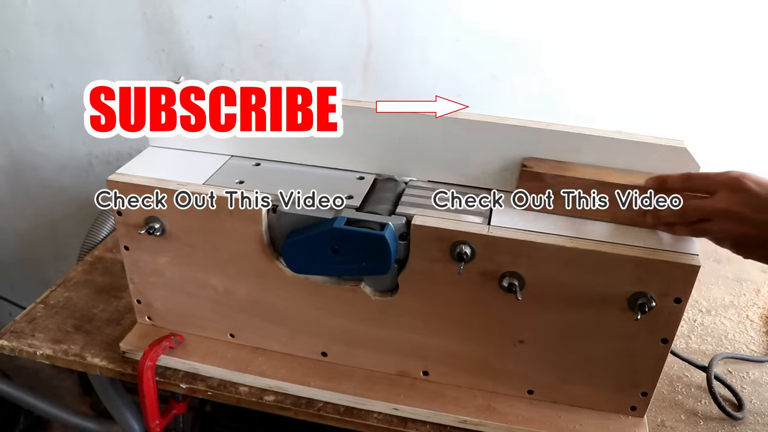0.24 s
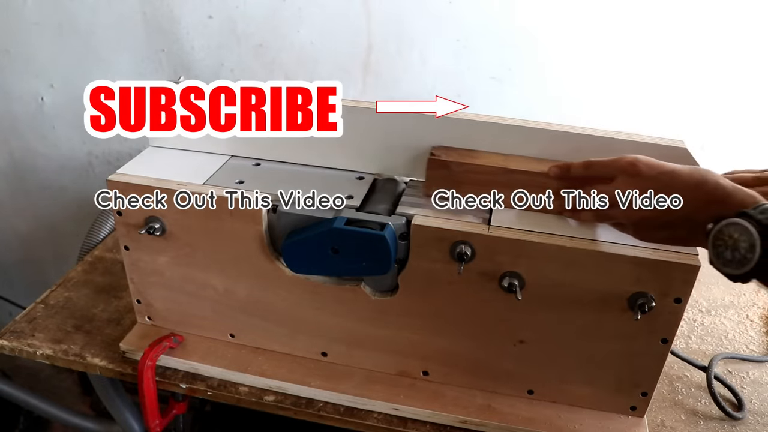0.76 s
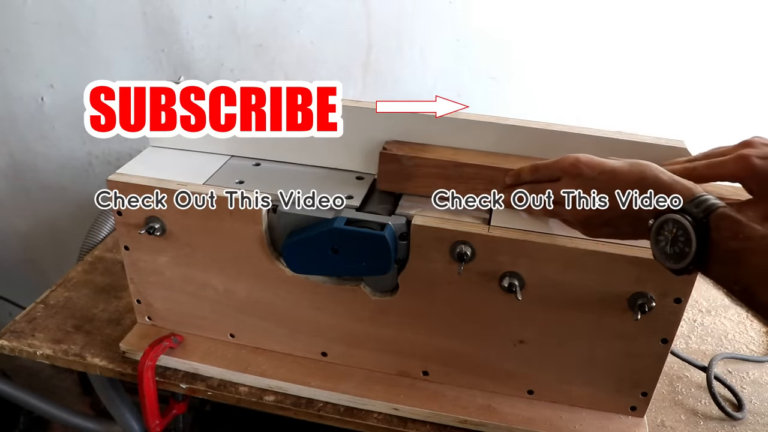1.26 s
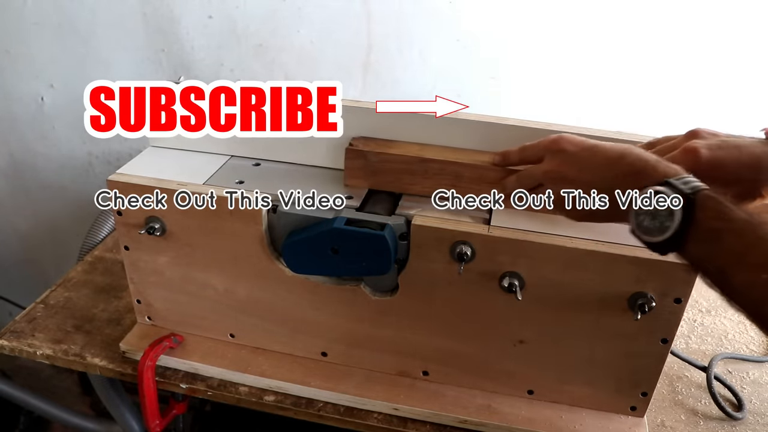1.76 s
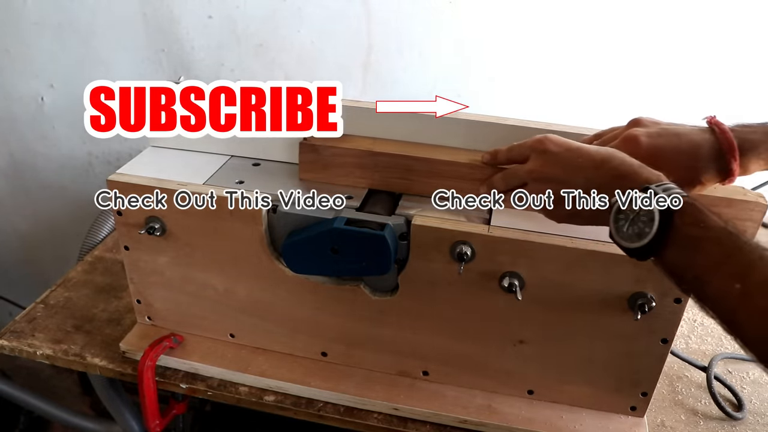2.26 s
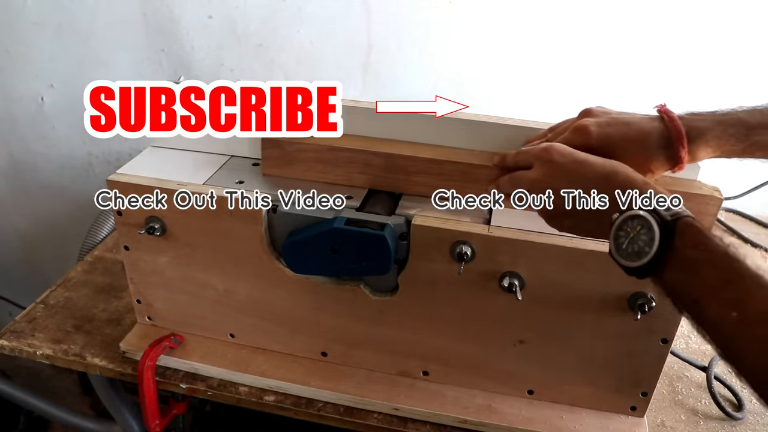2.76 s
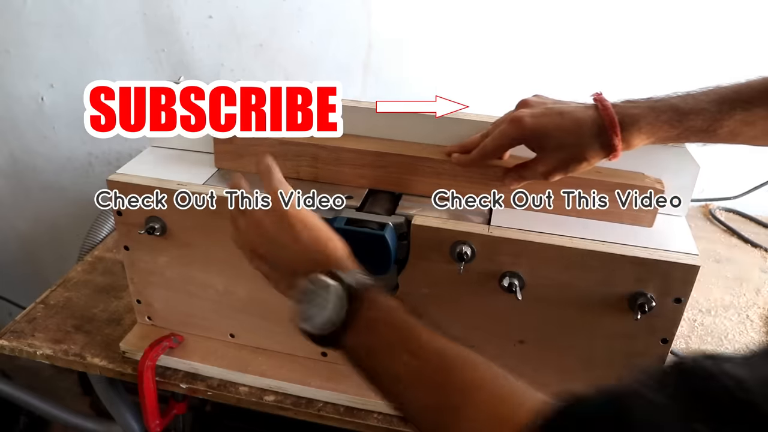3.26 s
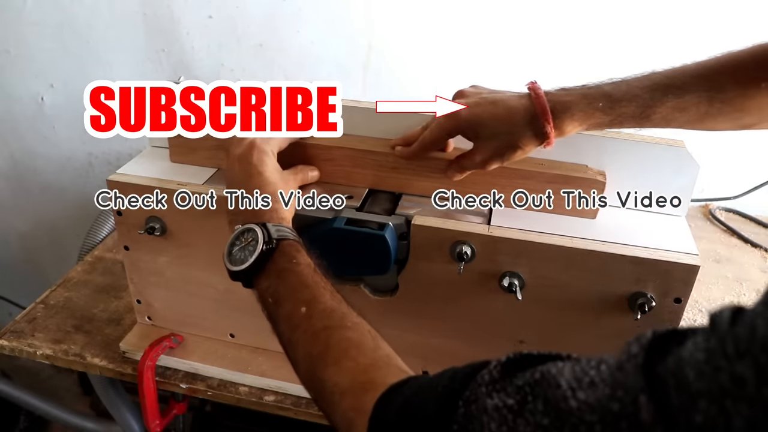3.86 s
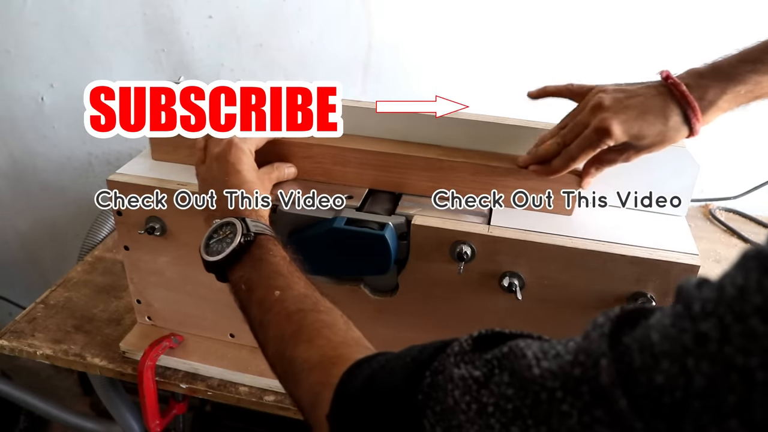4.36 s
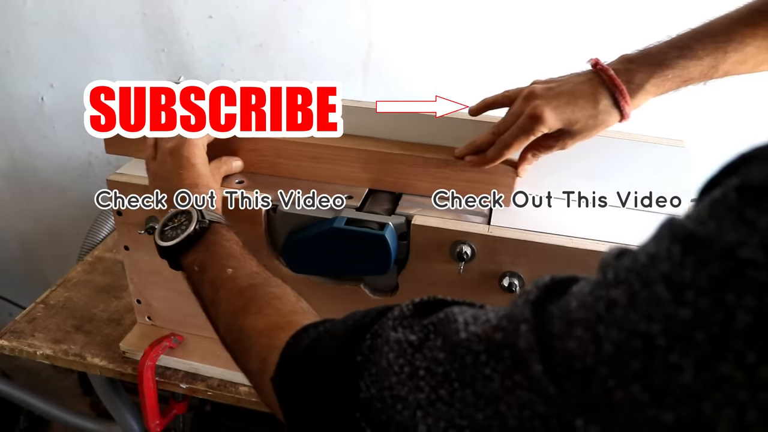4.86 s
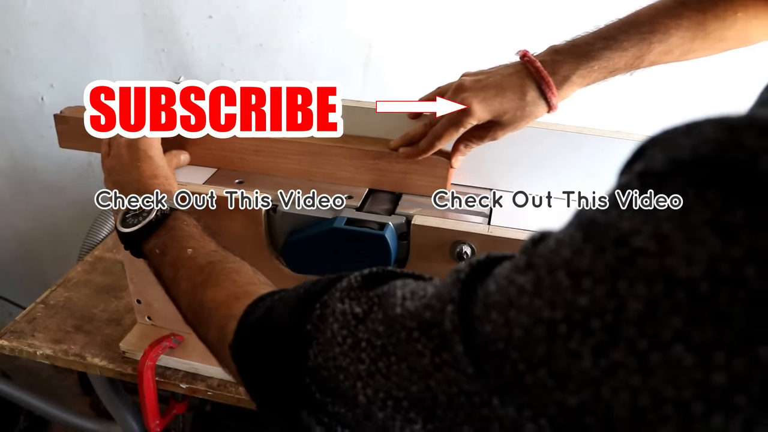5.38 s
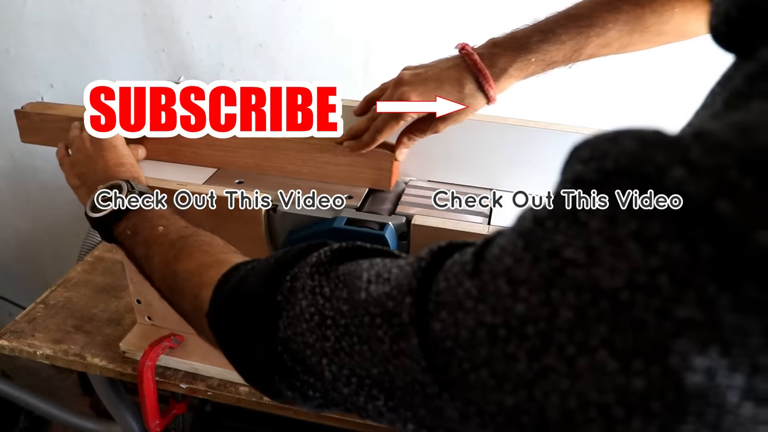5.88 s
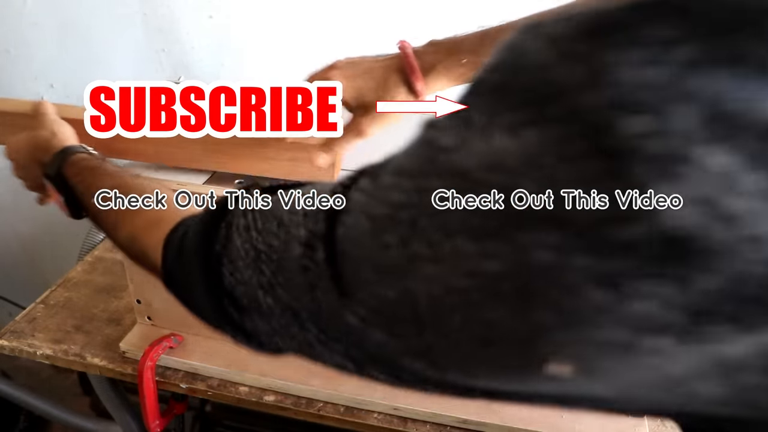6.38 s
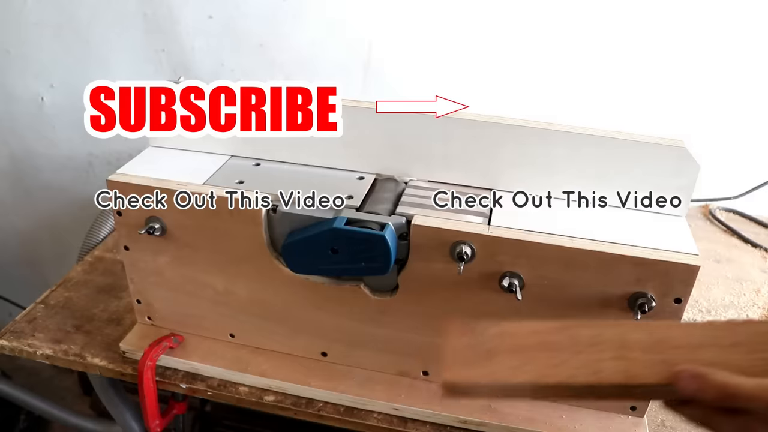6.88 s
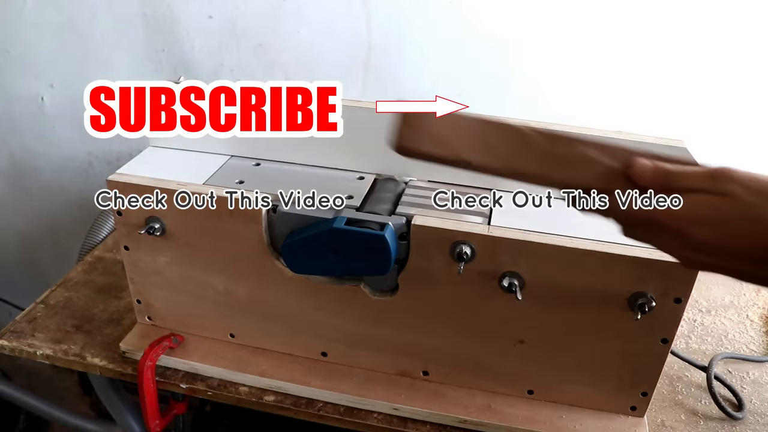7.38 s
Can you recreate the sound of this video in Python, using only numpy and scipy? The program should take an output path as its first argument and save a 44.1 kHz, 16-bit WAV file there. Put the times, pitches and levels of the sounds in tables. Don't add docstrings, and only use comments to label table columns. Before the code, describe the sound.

An electric planer whines shrilly at full speed with hissing air and chips as a board passes its cutter, then begins winding down.

```python
import sys
import numpy as np
from scipy import signal
from scipy.fft import rfft, irfft
from scipy.io import wavfile
from scipy.ndimage import uniform_filter1d

SR = 44100
rng = np.random.default_rng(int(sys.argv[2]) if len(sys.argv) > 2 else 0)


def store_wav(level_fs):
    pcm = np.round(np.clip(np.atleast_2d(level_fs), -1, 1) * 32767)
    wavfile.write(sys.argv[1], SR, pcm.T.astype(np.int16))


def rack_gain(trim_db):
    fader = np.asarray(trim_db, float)
    return 10 ** (fader / 20)


N = 336483
STEP = 40
GRID_S = np.arange(0, N + STEP, STEP) / SR
DRUM_RATIO = .8918


def rms_one(x):
    return x / np.sqrt(np.mean(x ** 2) + 1e-20)


def in_time(rows):
    s, *columns = np.transpose(rows)
    return [np.interp(GRID_S, s, c) for c in columns]


def at_hz(points, hz):
    points = np.array(points)
    return np.interp(np.log(hz), np.log(points[:, 0]), points[:, 1])


def smooth(control):
    between = np.arange(STEP) / STEP
    return (control[:-1, None] + np.diff(control)[:, None] * between).ravel()[:N]


def bump(x, centre, width):
    return np.exp(-4 * ((x - centre) / width) ** 2)


def drift(rate_hz):
    r = np.exp(-2 * np.pi * STEP * rate_hz / SR)
    noise = rng.standard_normal(len(GRID_S) + 2000)
    return rms_one(signal.lfilter([1], [1, -2 * r, r * r], noise)[2000:])


# t/s, fan blade rate f/Hz
SPEED = [(0.0, 1237.6), (0.77, 1240.5), (1.29, 1241.6), (1.74, 1235.6), (2.01, 1234.1), (2.37, 1239.7),
         (2.79, 1241.8), (3.18, 1239.4), (3.56, 1242.0), (4.11, 1245.2), (4.88, 1245.0), (5.23, 1234.6),
         (5.35, 1236.7), (5.78, 1216.1), (5.94, 1198.1), (6.18, 1220.8), (6.51, 1237.0), (7.01, 1245.1)]


def motor():
    power_off_s, inertia_s, coast_per_s = 7.01, .14, .63
    off = np.clip(GRID_S - power_off_s, 0, None)
    powered_hz = uniform_filter1d(in_time(SPEED)[0], size=int(inertia_s * SR / STEP), mode="nearest")
    blade_hz = powered_hz * np.exp(-coast_per_s * off)
    blades = np.cumsum(smooth(blade_hz + 0.443 * drift(16.8))) / SR
    coasting = np.interp(off, [0, .08], [0, 1])
    load = np.clip((1233 - blade_hz) / 12, 0, 1) * (1 - coasting)
    return blade_hz, blades, load, coasting, off


def line(turns, level_db, wobble_db, apart, lean=0.41):
    angle = 2 * np.pi * (turns + rng.random())
    shared = rack_gain(level_db + wobble_db * drift(6.2))
    usual = apart * rack_gain(0.58 * level_db + 0.39 * np.median(level_db))
    mid = smooth(shared) * np.sin(angle)
    in_phase = smooth(usual * drift(0.71) / shared - lean) * mid
    side = in_phase + smooth(usual * drift(0.61)) * np.cos(angle)
    return np.sqrt(2) * np.array([mid + side, mid - side])


# f/Hz, width/Hz, level/dB
STANDING = [(1100, 14, 10), (1235, 10, -13), (2191, 29, 6), (2441, 20, -14), (2491, 14, -8), (3322, 19, 9),
            (3729, 30, 11), (4962, 18, -11), (6205, 22, 10), (7437, 27, -12), (8670, 21, 8), (9896, 56, -5),
            (9968, 16, -22), (11169, 18, -13)]
# f/Hz, width/Hz, level/dB
CROSSED = [(813, 31, 8), (924, 33, 9), (996, 25, 6.5), (1787, 120, 6), (1995, 99, 5), (2680, 82, 10),
           (2846, 77, 10), (3186, 95, 8)]


def comb(rows, shifts, rate_hz, turns, coasting, wobble_db, apart):
    out = 0
    for k, db, coast_db in rows:
        k = int(k + .5)
        level_db = db + coast_db * coasting
        for hz, width, d in [*STANDING, *CROSSED]:
            level_db = level_db + d * bump(k * rate_hz, hz, width)
        for s, multiple, length, d in shifts:
            if abs(multiple - k) < .5:
                level_db = level_db + d * bump(GRID_S, s, length)
        out = out + line(k * turns, level_db, wobble_db, apart)
    return out


# multiple of blade rate, level/dB, gain while coasting/dB
FAN = [(1, -59.5, 1.5), (2, -44.5, -4.7), (3, -58.5, 2.5), (4, -54, -0.2), (5, -56, 0.2), (6, -44.5, -7),
       (7, -55, -0.2), (8, -60, 1), (9, -57, 3), (10, -62, 5)]
# multiple of blade rate, level/dB
FAN_TOP = [(11, -69), (12, -74), (13, -75), (14, -85)]
# t/s, multiple of blade rate, length/s, level/dB
FAN_SHIFTS = [(0.64, 6, 0.94, -13), (0.72, 10, 0.74, 9.5), (1.143, 5, 0.28, -10.5), (1.152, 8, 0.22, 11.5),
              (1.36, 3, 0.33, 6), (1.72, 7, 0.86, -19), (1.806, 4, 1.04, 9), (2.006, 3, 0.6, -8),
              (2.09, 2, 1.4, -7), (2.213, 5, 0.66, -18), (2.32, 1, 1.3, -10), (2.954, 7, 0.43, -11),
              (3.646, 7, 0.6, -16), (3.64, 10, 1.4, -17), (3.953, 6, 0.66, -7.5), (4.095, 9, 0.45, 7),
              (4.158, 4, 0.67, 8.5), (4.52, 1, 2.2, -6), (4.72, 5, 0.63, -13), (5.203, 3, 1.1, -4),
              (5.24, 10, 0.33, 8), (5.286, 6, 0.4, -12), (5.475, 5, 0.086, 13), (5.586, 7, 0.67, -7),
              (5.72, 4, 1.4, -0.5), (6.166, 2, 0.49, 6.5), (6.152, 6, 0.75, -13.5), (6.27, 7, 0.51, 7.5),
              (6.89, 6, 0.25, -9), (6.92, 8, 1.35, 11)]


def fan(blade_hz, blades, coasting):
    out = comb(FAN, FAN_SHIFTS, blade_hz, blades, coasting, wobble_db=1.23, apart=0.36)
    for k, db in FAN_TOP:
        out += line(int(k + .5) * blades, db + 5.5 * coasting, 4.9, 0.41)
    return out


# multiple of knife rate, level/dB, gain while coasting/dB
DRUM = [(1, -61.5, 1.5), (2, -76.5, 3.5), (3, -67.5, 0)]
# multiple of knife rate, level/dB
DRUM_TOP = [(4, -71.5), (5, -81), (9, -67)]
# t/s, multiple of knife rate, length/s, level/dB
DRUM_SHIFTS = [(0.4, 1, 0.21, 6.5), (0.68, 2, 0.21, 12.5), (0.72, 3, 0.31, 11.5), (1.36, 1, 0.16, -7),
               (1.84, 2, 0.38, 12), (2.32, 3, 1, -14), (3.72, 1, 0.34, -17), (3.8, 3, 0.74, -9),
               (5.0, 1, 0.28, -4), (5.399, 2, 1.4, 14.5), (7.4, 2, 0.47, 24), (7.44, 1, 1.76, 8)]


def drum(blade_hz, passes, coasting):
    out = comb(DRUM, DRUM_SHIFTS, DRUM_RATIO * blade_hz, passes, coasting, wobble_db=1.03, apart=0.32)
    for k, db in DRUM_TOP:
        out += line(int(k + .5) * passes, db + 3.0 * coasting, 4.9, 0.23)
    return out


# multiple of blade rate, level/dB, gain under load/dB, gain while coasting/dB
SHAFT = [(.5, -72.5, -21, 6), (3.5, -67, -13, -9), (4.5, -62.5, 2, 4.5), (8.5, -69, 2, -1)]
# t/s, length/s, level/dB
SHAFT_SHIFTS = [
    (.5, 1.5, -10),
    (3.3, 1.5, 5.5),
    (5.157, .7, 8),
    (6.6, 1.2, -20),
]
# multiple of blade rate, level/dB
FAINT = [(5.5, -72.5), (6.5, -72), (7.5, -69.5), (9.5, -71), (10.5, -77), (11.5, -80), (12.5, -78)]
# shaft turns, knife passes, level/dB
BEATS = [(1, 1, -65.5), (-0.58, 11, -87)]


def shaft(blades, passes, load, coasting):
    out = 0
    ninth_db = sum(d * bump(GRID_S, s, length) for s, length, d in SHAFT_SHIFTS)
    for k, db, load_db, coast_db in SHAFT:
        level_db = db + load_db * load + coast_db * coasting + ninth_db * (4 < k < 5)
        out = out + line(int(2 * k + .5) * blades / 2, level_db, 1.0, 0.1, lean=0.23)
    for m, k, db in BEATS:
        out += line(m * blades / 2 + k * passes, db - 9 * load - 9 * coasting, 3.4, 0.1)
    for k, db in FAINT:
        out += line(int(2 * k + .5) * blades / 2, db + 2.6 * coasting, 3.5, 0.45)
    return out


def light_rotor(blades, load, coasting, off):
    rotor_hz, drag_per_s, throb_hz, throb_db = 984.5, .65, 9.9, 4
    rotor = np.cumsum(smooth(rotor_hz / (1 + drag_per_s * off) ** 2)) / SR
    throb = throb_db * coasting * np.cos(2 * np.pi * throb_hz * (off - .1))
    out = line(rotor, -65 + 5 * np.tanh(off / .2) + throb, 0.59, 0.13, lean=.25)
    return out + line(rotor + blades / 2, -70 - 9 * load - 15 * coasting, 0.83, 0.22)


def whine():
    blade_hz, blades, load, coasting, off = motor()
    passes = DRUM_RATIO * blades
    out = fan(blade_hz, blades, coasting) + drum(blade_hz, passes, coasting)
    out += shaft(blades, passes, load, coasting) + light_rotor(blades, load, coasting, off)
    return out, load, coasting, off


# t/s, level/dB, brightness above the body/dB per octave
RUSH = [(0, -3, 0.9), (.5, 2, -0.9), (1, 0.5, 0.3), (2, -3.7, 1.1), (3, -1, 0), (3.55, 1, 0.6),
        (4, 3.2, 0.2), (4.5, -0.4, -0.3), (4.8, 2, 1), (5.39, 5.5, 0.2), (5.47, -2.8, 2.4), (5.65, -5.5, 0),
        (5.79, 3.8, 2), (5.95, -5.5, -1.5), (6.13, 2.8, 1.1), (6.24, -0.5, -3.3), (6.42, 3.5, 0.1),
        (6.96, 0.7, -0.4)]
# f/Hz, level/dB per Hz
AIR = [(71, -79), (120, -43.5), (615, -20.5), (906, -20.5), (1090, -13), (1360, -15), (2270, -8),
       (2420, -14), (2620, -5.5), (3640, -10), (5940, -7.5), (6310, -12), (6850, -8), (15800, -20.5)]
# f/Hz, width/Hz, level/dB
HOLLOWS = [(175, 5.6, 12), (238.8, 4.9, 17), (285.3, 3.4, 17), (348.3, 5.3, 14.5), (1775, 27, 7)]
# f/Hz, share alike
LIKENESS = [(60, 0.52), (240, 0.9), (950, 0.9), (3770, 0.41), (15000, 0.081)]
# f/Hz, level/dB
LEAN = [(60, -3), (240, -4), (950, 1), (3770, -5), (15000, 0.5)]
# f/Hz, share of swing, gain at power-off/dB, further change while coasting/dB per s
RUSH_COLOUR = [(1600, 0.75, 1.4, 8.5), (4600, 0.64, 0, 7), (10000, 0.95, 9, -8)]


def rush(coasting, off, patchy_db):
    swing_db, tilt_db = in_time(RUSH)
    white = rng.standard_normal((2, 2, N))
    together = drift(4.0)
    edges = 110 * 2 ** (np.arange(23) / 3)
    hz = np.fft.rfftfreq(N, 1 / SR)
    boost = 1 + sum((rack_gain(db) - 1) / (1 + (2 * (hz - top) / width) ** 2) for top, width, db in HOLLOWS)
    white = irfft(rfft(white) * boost, N)
    colour = np.array(RUSH_COLOUR)
    out = 0
    for k, (low, high) in enumerate(zip(edges, edges[1:])):
        band = signal.butter(2, [low, high], "band", fs=SR, output="sos")
        mid, side = signal.sosfilt(band, white[k % 2])
        centre = np.sqrt(low * high)
        share, off_db, slide_db = [at_hz(colour[:, [0, c]], centre) for c in (1, 2, 3)]
        level_db = share * swing_db + tilt_db * max(np.log2(centre / 1600), 0)
        level_db = level_db + off_db * coasting + slide_db * off - (1.5 + centre / 2500) * coasting
        patches_db = patchy_db * (.5 * together + drift(5.5))
        gain = smooth(rack_gain(at_hz(AIR, centre) + level_db + patches_db))
        alike = np.clip(at_hz(LIKENESS, centre), 0, .97)
        lean = rack_gain(at_hz(LEAN, centre) * np.array([[.5], [-.5]]))
        out = out + gain * lean * (np.sqrt(1 + alike) * mid + np.sqrt(1 - alike) * side * [[1], [-1]])
    return rack_gain(-48.0) * rms_one(out)


# t/s, level/dB
RUMBLE = [
    (0.0, -101),
    (4.5, -99),
    (4.68, -91),
    (6.16, -103),
    (6.69, -87),
    (7.52, -92),
    (7.63, -82),
]


def rumble():
    band = signal.butter(2, [50, 100], "band", fs=SR, output="sos")
    mid, side = signal.sosfilt(band, rng.standard_normal((2, N)))
    return smooth(rack_gain(in_time(RUMBLE)[0])) * (rms_one(mid) + .25 * rms_one(side) * [[1], [-1]])


def shop(x):
    t60_s, gap_s, level_db = 0.21, .006, 4.5
    t = np.arange(SR // 2) / SR
    both, left, right = rng.standard_normal((3, len(t))) * rack_gain(-60 * t / t60_s) * (t > gap_s)
    left, right = signal.sosfilt(signal.butter(2, 900, "high", fs=SR, output="sos"), [left, right])
    echoes = np.array([both + .55 * left, both + .55 * right])
    echoes /= np.sqrt(np.sum(echoes ** 2, axis=1, keepdims=True))
    return rack_gain(level_db) * signal.fftconvolve(x, echoes, axes=1)[:, :N]


def scene():
    tones, load, coasting, off = whine()
    trailing = smooth(.05 + .36 * uniform_filter1d(load, size=200) + .45 * coasting)
    heard = rack_gain(-0.65) * np.sqrt(1 - trailing ** 2) * tones + shop(trailing * tones)
    return heard + rush(coasting, off, patchy_db=1.82) + rumble()


def roll_off(x):
    return signal.sosfilt(signal.butter(12, 15800, fs=SR, output="sos"), x)


def record(dry):
    return roll_off(dry)


dry = scene()
out = record(dry)
store_wav(out)
```